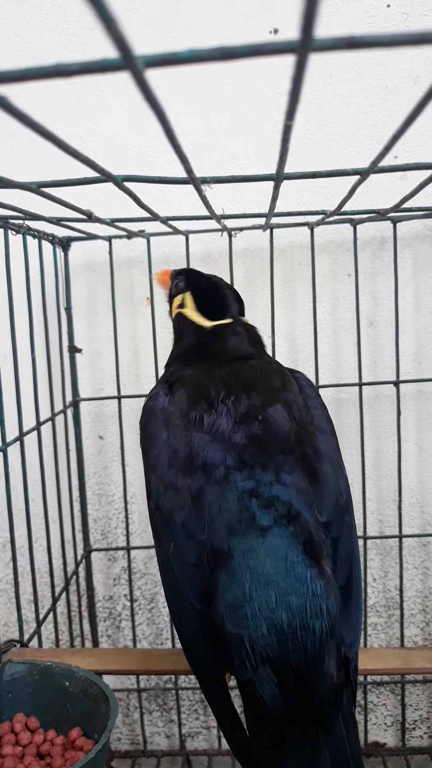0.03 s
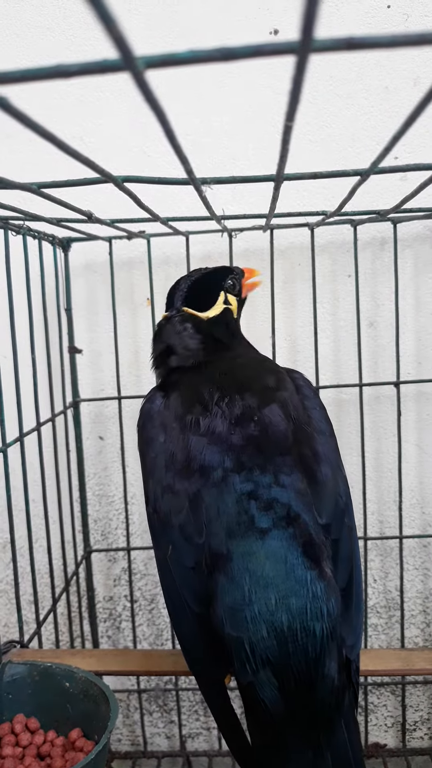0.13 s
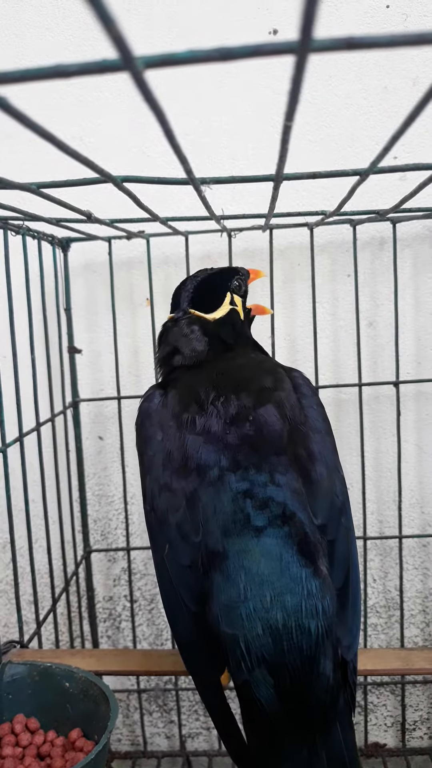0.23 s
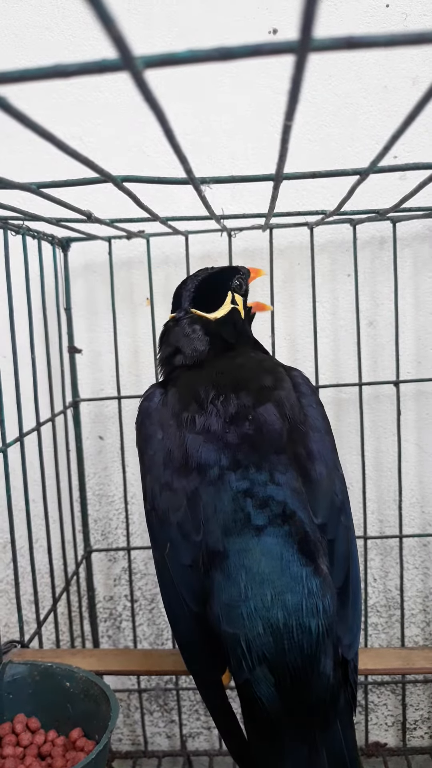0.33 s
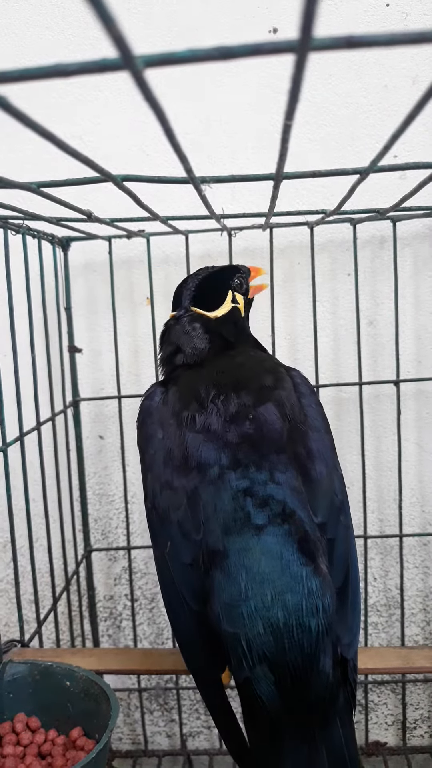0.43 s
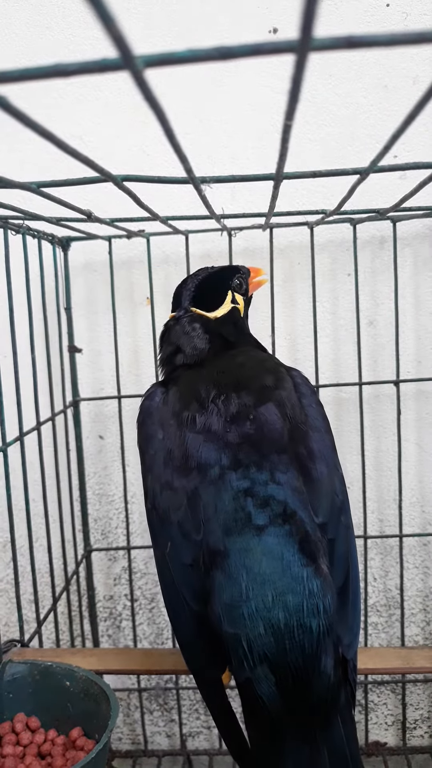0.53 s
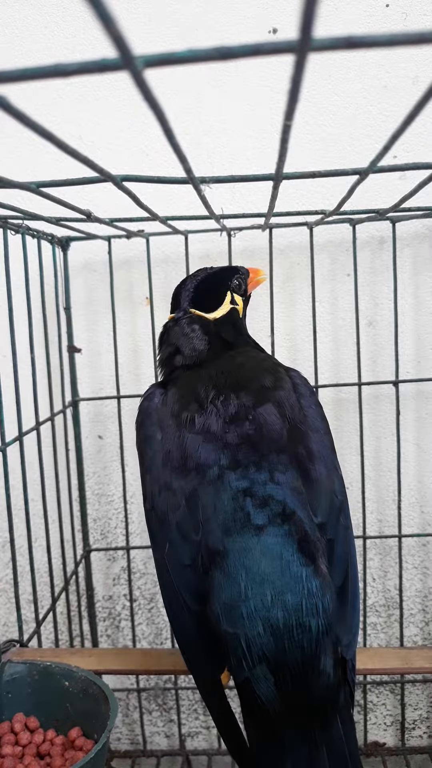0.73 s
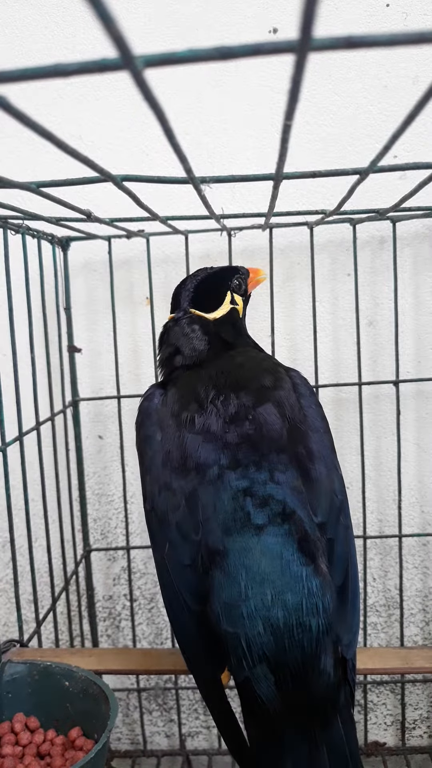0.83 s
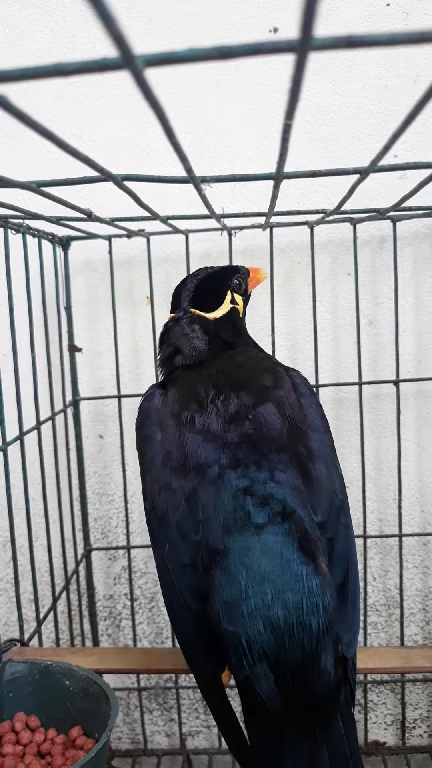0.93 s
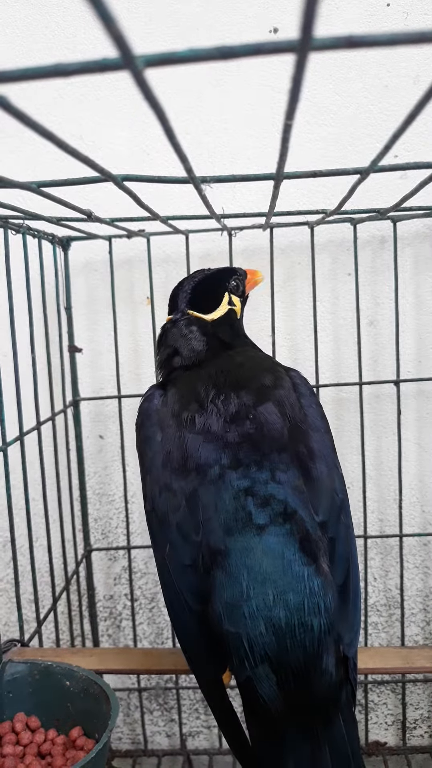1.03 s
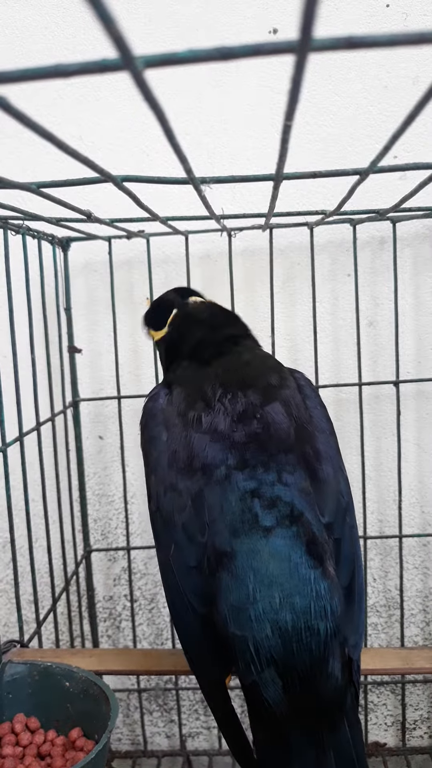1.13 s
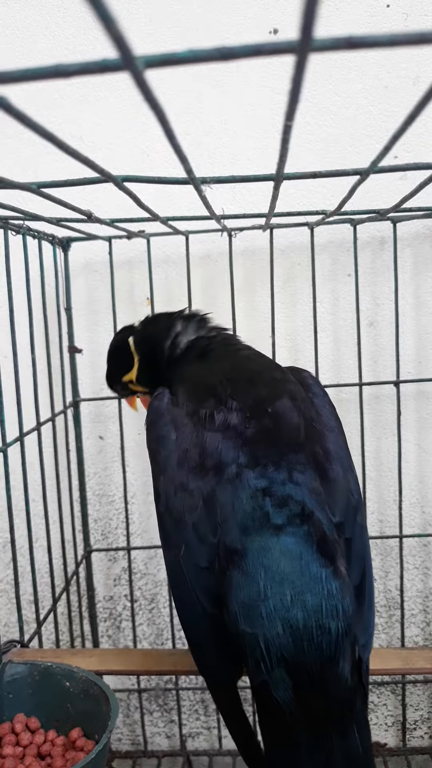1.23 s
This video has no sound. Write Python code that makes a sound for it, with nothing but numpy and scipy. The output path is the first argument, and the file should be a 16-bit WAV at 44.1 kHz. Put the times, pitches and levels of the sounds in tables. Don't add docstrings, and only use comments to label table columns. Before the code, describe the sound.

A caged myna gives one loud, harsh rising squawk, then starts a faint falling call.

```python
import sys
import numpy as np
from scipy import signal
from scipy.fft import rfft, irfft, next_fast_len
from scipy.io import wavfile
from scipy.ndimage import uniform_filter1d, minimum_filter1d, map_coordinates

SR = 44100
rng = np.random.default_rng(int(sys.argv[2]) if len(sys.argv) > 2 else 0)


def transcribe(signal):
    frames = np.atleast_2d(signal).T
    limited = np.clip(frames, -1, 1)
    pcm = np.round(limited * 32767).astype(np.int16)
    wavfile.write(sys.argv[1], SR, pcm)


def voltage_ratio(decibels):
    exponent = np.asarray(decibels, float) / 20
    return 10 ** exponent


N = 57330
TOP_HZ = 15830


def unit(x):
    return x / np.sqrt(np.mean(x ** 2) + 1e-20)


def along(points, hz):
    f, v = np.transpose(points)
    return np.interp(np.log(hz + 1), np.log(f + 1), v)


def wobble(rate_hz):
    knots = rng.standard_normal(int(N * 1000 / SR) + 4)
    return map_coordinates(knots, [np.arange(N) * min(rate_hz, 999) / SR])


def filtered(x, response):
    m = next_fast_len(N + SR // 2)
    hz = np.fft.rfftfreq(m, 1 / SR)
    return irfft(rfft(x, m) * response(hz), m)[:N]


def rush(spectrum, patchy_db):
    z = signal.stft(rng.standard_normal(N), nperseg=512)[2]
    field = uniform_filter1d(rng.standard_normal(z.shape), 5, 0)
    field = uniform_filter1d(field, 8, 1)
    noise = signal.istft(z * voltage_ratio(patchy_db * unit(field)), nperseg=512)[1][:N]
    return unit(filtered(noise, lambda hz: voltage_ratio(along(spectrum, hz))))


# (time [s], pitch [Hz], level [dB], mouth resonance [kHz], flutter depth [0-1])
RISING_CALL = [
    (.162, 767.6, -53.5, 1.8, .1),
    (.182, 886, -25.5, 1.56, 0.3),
    (.199, 1068, -20.5, 2.33, 0.65),
    (.212, 1114, -13.5, 4.14, .7),
    (.236, 1127, -10, 3.55, 0.42),
    (.262, 1155, -18, 3.58, 0.87),
    (.31, 1387, -9, 4.12, 0.51),
    (.334, 1373, -16.5, 3.94, 0.47),
    (.349, 1387, -24.5, 2.9, 0.8),
]
FALLING_CALL = [
    (1.254, 1120, -67, 1.7, 0.081),
    (1.262, 1100, -37, 2, 0.22),
    (1.281, 967, -40.5, 1.3, .5),
    (1.291, 945, -36.5, 2.1, .5),
    (1.3, 887, -31.5, 2.26, 0.6),
]
# (frequency [Hz], gain [dB])
HEAD_RAISED = [(800, -10.5), (1300, -2.5), (2300, -3), (3000, -9.5), (3500, -0.5), (4600, 3), (4850, -19),
               (5650, -8.5)]
HEAD_LOWERED = [(800, -5), (1100, -1), (2000, 2), (2800, 2.5), (3200, -4), (3600, -24), (5700, -21)]
# (frequency [Hz], gain [dB])
BEAK = [(5950, -14.5), (7000, -25.5), (8500, -27), (9800, -53), (12800, -48), (14200, -23.5),
        (16000, -28.5)]
# (frequency [Hz], density [dB per Hz])
BREATH = [(300, -15.5), (700, -11.5), (1600, -2.5), (3000, -0.5), (4400, -13.5), (6500, -10.5),
          (11500, -38), (14500, -35)]
FLUTTER_SHARE = [.3, .55, 1, .3, .6]
MOUTH_Q, MOUTH_ORDER = 2.13, 0.96
BREATH_DB, BREATH_GROWS = -22.5, 1.07
FLUTTER_HZ, FLUTTER_HZ_PER_PITCH_HZ, FLUTTER_DRIFT = 176, .13, .02
FLUTTER_PEAK_S = .2325
FLUTTER_SWING_RAD, FLUTTER_LAG_RAD = .15, 0.85
JITTER_HZ, SHIMMER_DB, RASP_DB, FADE_S = 10, 1.8, -23.5, .005


def call(rows, throat):
    t = np.arange(N) / SR
    s, *cols = np.transpose(rows)
    pitch_hz, level_db, mouth_khz, depth = [np.interp(t, s, c) for c in cols]
    depth = np.clip(depth, 0, 1)

    flutter_hz = FLUTTER_HZ + FLUTTER_HZ_PER_PITCH_HZ * (pitch_hz - 1130)
    flutter = 2 * np.pi * np.cumsum(flutter_hz * (1 + FLUTTER_DRIFT * wobble(40))) / SR
    flutter = flutter - flutter[round(FLUTTER_PEAK_S * SR)]
    phase = 2 * np.pi * np.cumsum(pitch_hz + JITTER_HZ * wobble(150)) / SR
    phase += depth * FLUTTER_SWING_RAD * np.sin(flutter)

    voice, power = np.zeros(N), np.zeros(N)
    for k in range(1, 17):
        hz = k * pitch_hz
        u = hz / (1000 * mouth_khz)
        mouth_loss = np.abs(1 - u * u + 1j * u / MOUTH_Q) ** MOUTH_ORDER
        gain = voltage_ratio(along(throat + BEAK, hz)) / mouth_loss * (hz < TOP_HZ)
        share = FLUTTER_SHARE[min(k, len(FLUTTER_SHARE)) - 1]
        beat = 1 + depth * share * np.cos(flutter - FLUTTER_LAG_RAD * (k - 3))
        size = voltage_ratio(SHIMMER_DB * wobble(90)) * beat
        rasp = voltage_ratio(RASP_DB) * k * wobble(900)
        voice += gain * (size + rasp) * np.sin(k * phase + rng.uniform(0, 2 * np.pi))
        power += gain ** 2 / 2

    breath_db = BREATH_DB + BREATH_GROWS * (level_db + 10) - 10
    breath = voltage_ratio(breath_db) * (1 + depth * np.cos(flutter)) * rush(BREATH, patchy_db=3)
    outside_s = np.clip(s[0] - t, 0, 1) + np.clip(t - s[-1], 0, 1)
    return (voice / np.sqrt(power) * voltage_ratio(level_db) + breath) * np.exp(-outside_s / FADE_S)


# (time [s], peak [dB], brightness [dB per octave], scrape decay [s])
TICKS = [
    (.137, -44, 10, .004),
    (.5639, -19, 0, .00012),
    (1.1435, -30.5, -1, .0015),
]
# (frequency [Hz], width [Hz], level [dB])
WIRE = [(2100, 400, -19), (3700, 500, -11), (4450, 320, 0), (5000, 500, -2), (7300, 700, -17),
        (9800, 1500, -27), (14000, 2500, -26)]
# (lag [s], level [dB])
RATTLE = [(-.0025, -9), (0, 0), (.0025, -3), (.0043, -6), (.006, -10), (.0095, -12), (.013, -15),
          (.019, -17)]


def feet():
    out, t = np.zeros(N), np.arange(SR // 50) / SR
    for s, db, bright_db, scrape_s in TICKS:
        blows = np.zeros(N)
        for lag_s, level_db in RATTLE:
            burst = np.exp(-t / scrape_s) * rng.standard_normal(len(t))
            blows[round((s + lag_s) * SR):][:len(t)] += voltage_ratio(level_db) * unit(burst)

        def wire(f):
            modes = 0
            for k, (hz, width_hz, mode_db) in enumerate(WIRE):
                band = 1j * f * width_hz
                modes = modes + (-1) ** k * voltage_ratio(mode_db) * band / (hz * hz - f * f + band)
            return voltage_ratio(bright_db * np.log2((f + 1) / 4500)) * modes / (1 + 1j * f / 7000)

        tick = filtered(blows, wire)
        out += voltage_ratio(db) * tick / np.abs(tick).max()
    return out


# (frequency [Hz], t60 [s])
ROOM_T60 = [(500, .15), (1400, .2), (2800, 0.34), (4200, 0.21), (8000, 0.083)]
ROOM_DB, ROOM_GAP_S = -12, .004


def room(x):
    hz, t, z = signal.stft(rng.standard_normal(SR // 2), SR, nperseg=256)
    decay = voltage_ratio(-60 * t / along(ROOM_T60, hz)[:, None])
    tail = signal.istft(z * decay, SR, nperseg=256)[1]
    late = np.pad(x, (round(ROOM_GAP_S * SR), 0))
    return signal.fftconvolve(late, tail / np.linalg.norm(tail))[:N]


# (frequency [Hz], density [dB per Hz])
HUM = [(15, -57), (25, -37.5), (92, -3.5), (128, -5), (165, -3), (207, -9), (267, -1.5), (306, -8),
       (900, -14), (1170, -20), (1980, -120)]
HISS = [(530, -64.5), (900, -12.5), (1090, -8.5), (1160, -4), (3130, -10.5), (4330, -9), (7340, -19),
        (9320, -31.5), (15800, -34)]
# (time [s], level [dB])
HUM_DRIFT = [(0, 4), (0.499, 0.5), (0.899, 1.3), (1.3, 0.1)]
HUM_DB, HISS_DB = -45.5, -48


def background():
    drift_db = np.interp(np.arange(N) / SR, *np.transpose(HUM_DRIFT))
    hum = voltage_ratio(HUM_DB + drift_db + 0.37 * wobble(8.2)) * rush(HUM, patchy_db=0.85)
    hiss = voltage_ratio(HISS_DB + .4 * wobble(3.7)) * rush(HISS, patchy_db=2.9)
    return hum + hiss


def scene():
    near = call(RISING_CALL, HEAD_RAISED) + call(FALLING_CALL, HEAD_LOWERED) + feet()
    return (near + voltage_ratio(ROOM_DB) * room(near) + background())[None]


def top_cut(x):
    return signal.sosfilt(signal.butter(12, 16120, fs=SR, output="sos"), x)


CEILING, LIMIT_S = .97, .004


def record(dry):
    x = filtered(dry[0], lambda hz: hz < TOP_HZ)
    span = round(LIMIT_S * SR)
    gain = np.minimum(1, CEILING / (np.abs(x) + 1e-9))
    gain = minimum_filter1d(gain, size=2 * span)
    mix = (x * uniform_filter1d(gain, size=span))[None]
    return top_cut(mix)


dry = scene()
out = record(dry)
transcribe(out)
```